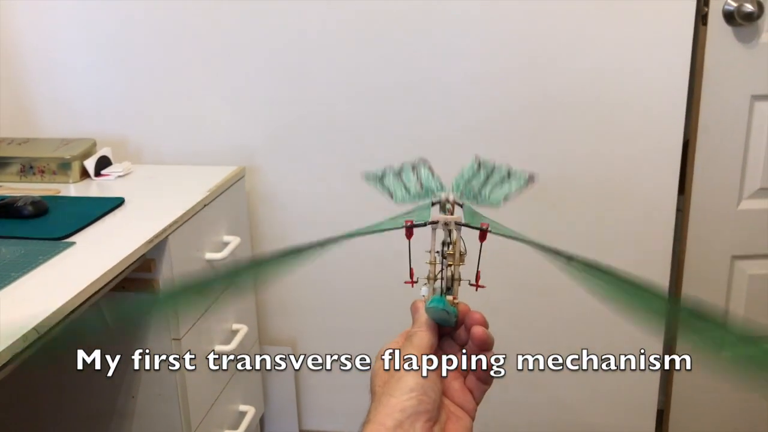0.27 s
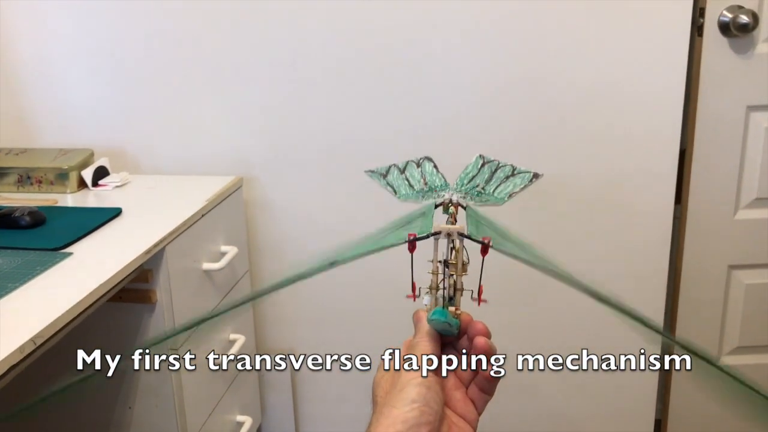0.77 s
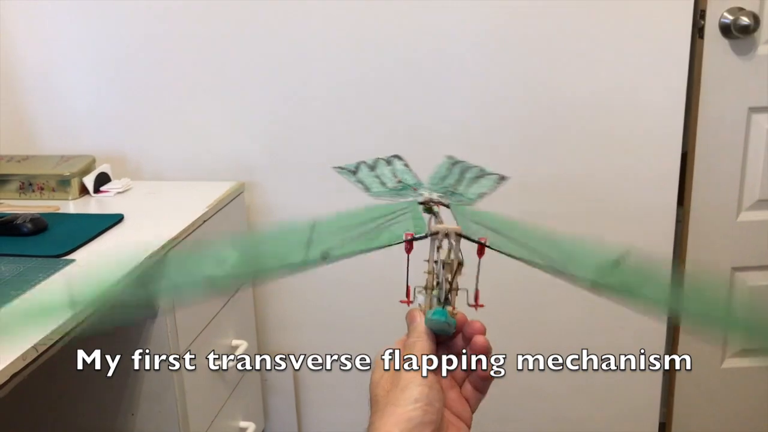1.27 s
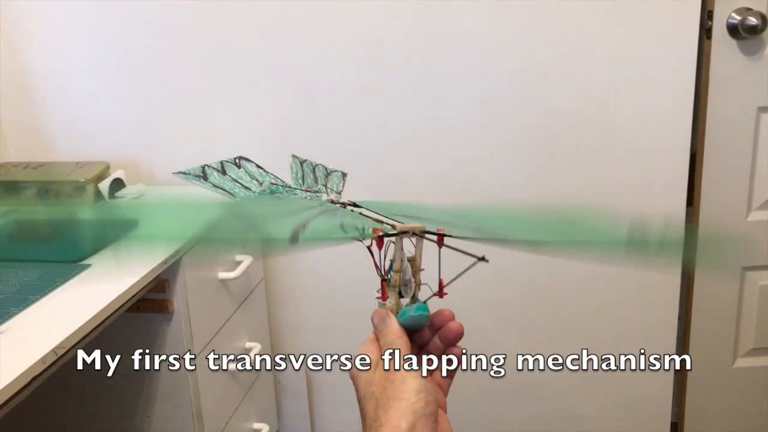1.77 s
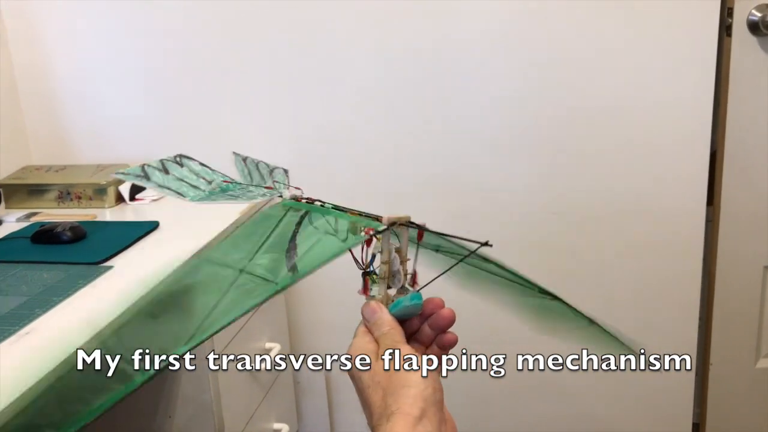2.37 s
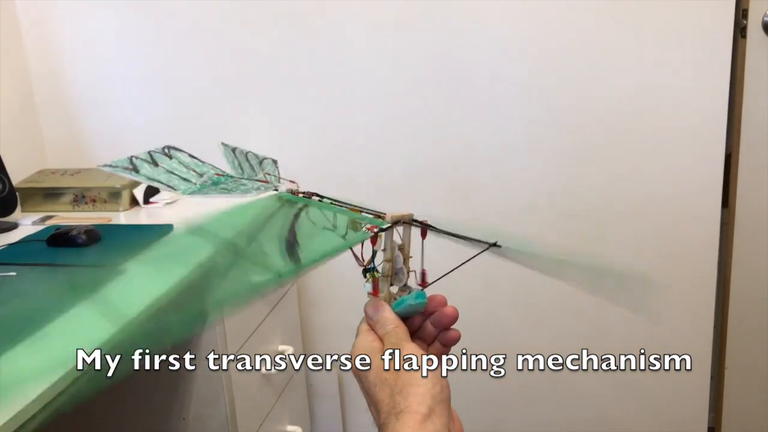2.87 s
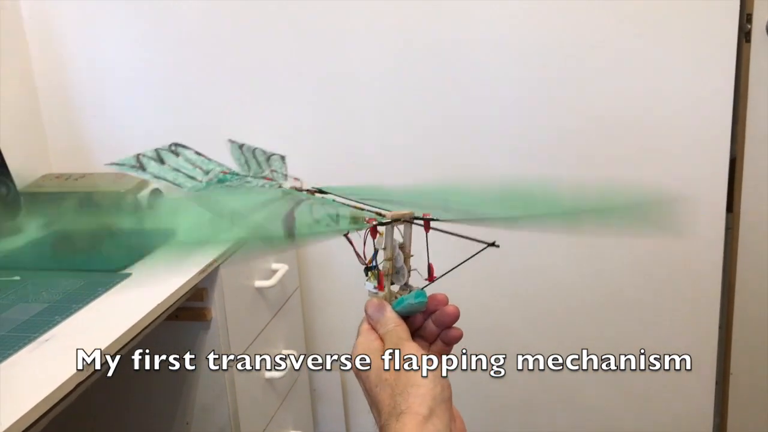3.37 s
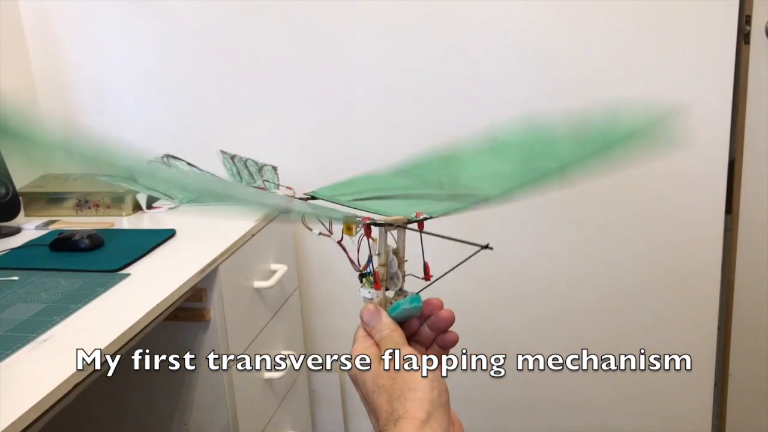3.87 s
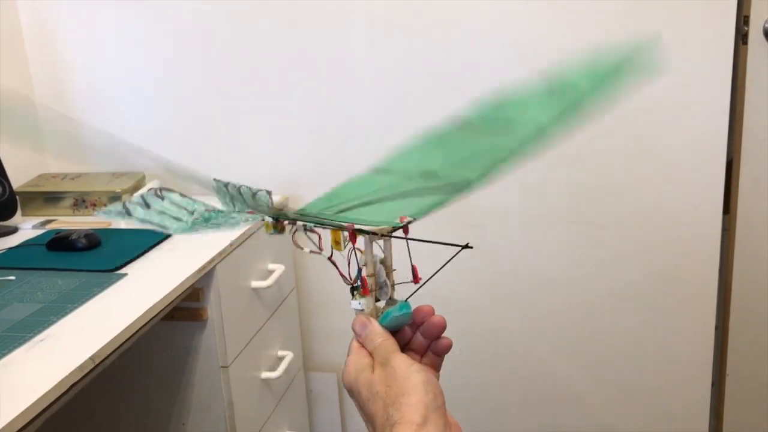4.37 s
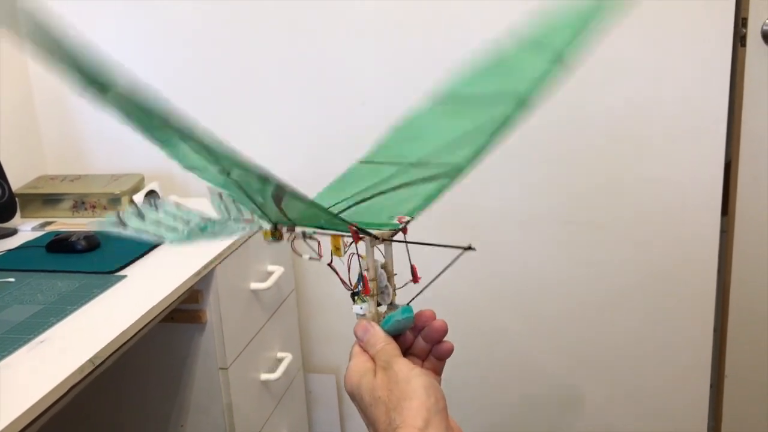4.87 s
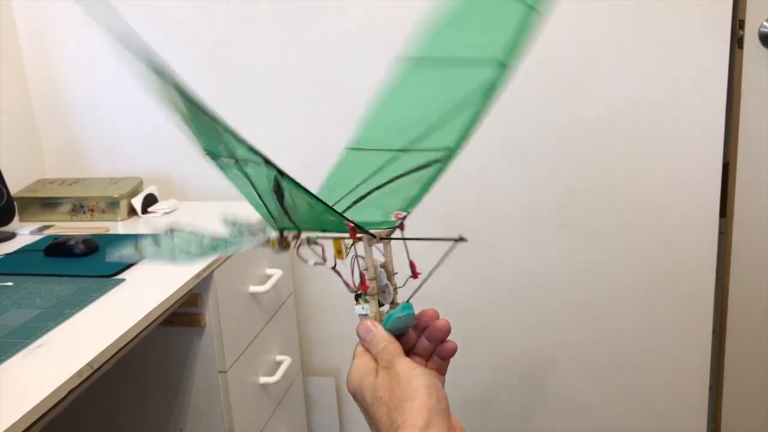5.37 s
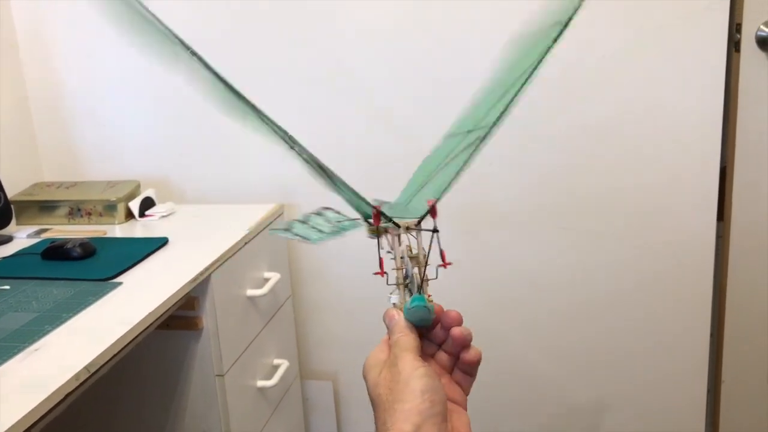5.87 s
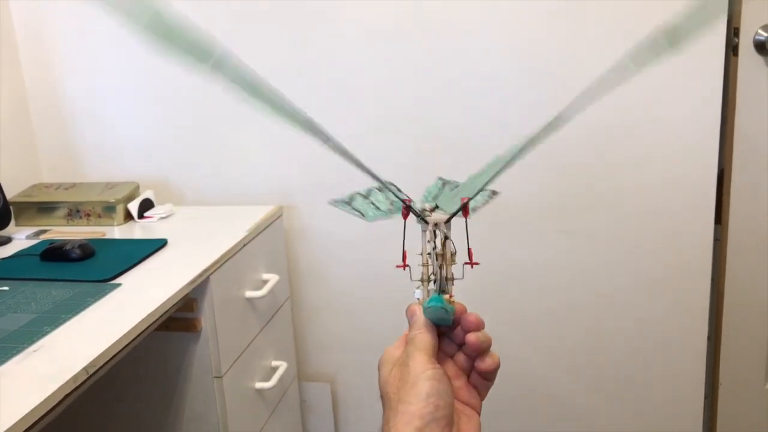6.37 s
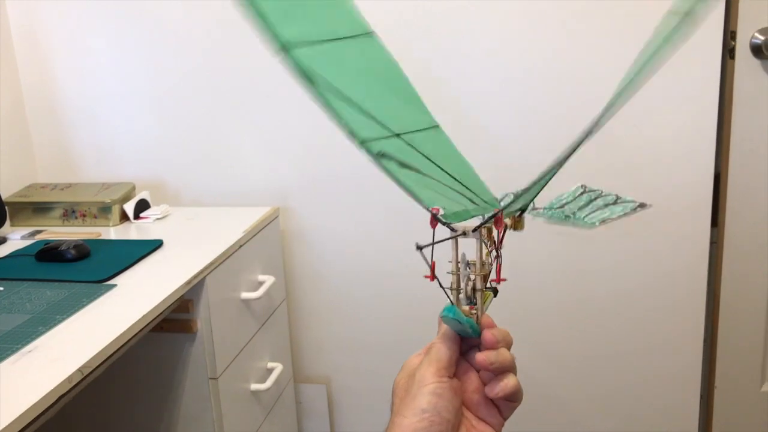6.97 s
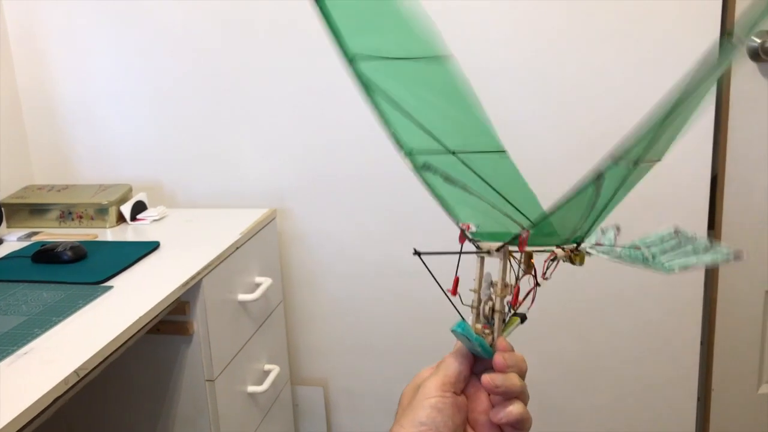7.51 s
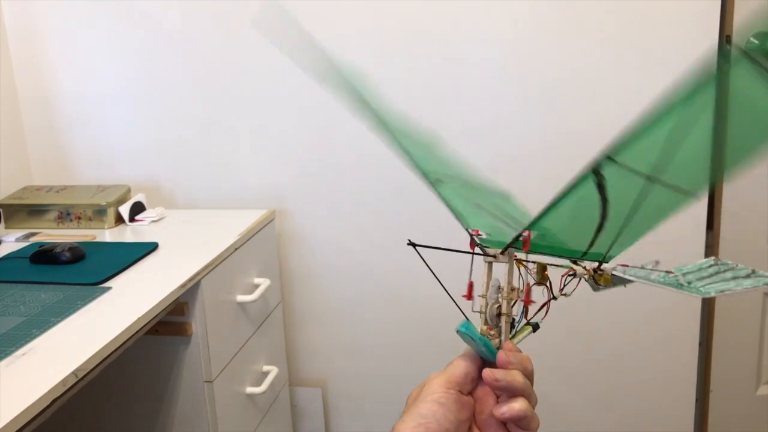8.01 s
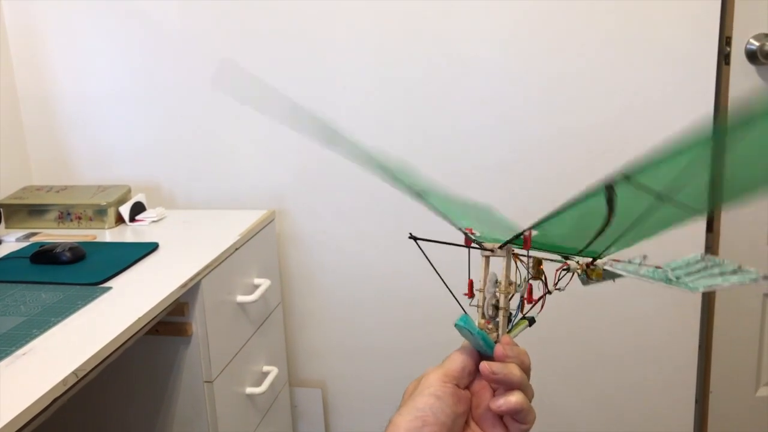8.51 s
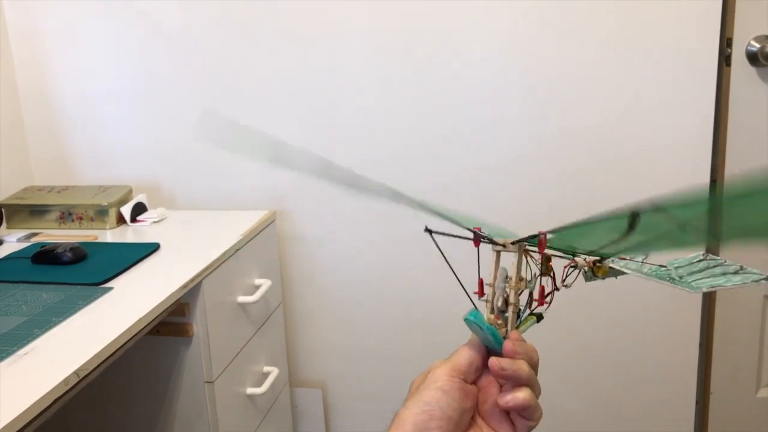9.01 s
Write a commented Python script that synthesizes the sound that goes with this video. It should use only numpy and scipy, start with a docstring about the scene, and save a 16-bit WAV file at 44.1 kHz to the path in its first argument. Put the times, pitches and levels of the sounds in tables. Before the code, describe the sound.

A tiny geared motor whines and rattles in swooping pulses, flapping a model bird's film wings nearly twice a second.

```python
"""A tiny geared motor whines inside a hand-held model bird, flapping its film wings nearly twice a second.
In every stroke it labours, races as the linkage goes slack and is braked almost to a stall, so the
whine swoops and the teeth rattle. The brushes hiss, the drive sizzles, the shaft hums, the wings rustle
and a loose joint ticks. The balance shifts as the bird is turned, in a small room with faint room tone."""
import sys
import numpy as np
from scipy import signal
from scipy.fft import rfft, irfft, next_fast_len
from scipy.io import wavfile
from scipy.ndimage import uniform_filter1d, map_coordinates

SR = 44100
rng = np.random.default_rng(int(sys.argv[2]) if len(sys.argv) > 2 else 0)


def file_out(sig):
    """Save sig as 16-bit WAV at sys.argv[1]."""
    # one column per channel
    cols = np.atleast_2d(sig).T
    # limit, then scale
    lim = np.clip(cols, -1, 1)
    pcm = np.round(lim * 32767).astype(np.int16)
    wavfile.write(sys.argv[1], SR, pcm)


N = 407925
TIME = np.arange(N) / SR

# The wingbeats. Each row: upstroke and downstroke starts in seconds, loaded speed factors up and down.
FLAP_CUES = [(-.177, .095, .99, .96), (.355, .639, .97, 1), (.894, 1.175, .98, .98),
             (1.437, 1.713, 1.03, 1.02), (1.97, 2.252, 1.01, 1.03), (2.506, 2.786, 1.01, 1.03),
             (3.037, 3.319, 1.01, .99), (3.571, 3.85, 1.01, 1), (4.113, 4.383, 1.02, 1.03),
             (4.64, 4.92, 1.01, 1.03), (5.176, 5.461, 1.01, 1), (5.717, 6.001, .98, 1.03),
             (6.254, 6.535, .98, .98), (6.793, 7.076, .98, .99), (7.341, 7.618, .98, .92),
             (7.887, 8.171, 1.01, 1), (8.431, 8.711, 1.03, 1), (8.97, 9.252, .99, 1)]
# The motor nearly stalls, recovers, sags under the air load, races and is braked.
# Each row: share of the stroke, tooth rate in Hz.
UP_SWOOP = [(0, 2300), (.14, 350), (.24, 1480), (.325, 1970), (.52, 1410), (.69, 1860), (.8, 2680),
            (.865, 3650), (.915, 4740), (.96, 3700)]
DOWN_SWOOP = [(0, 2170), (.14, 350), (.24, 1130), (.38, 2040), (.5, 1800), (.63, 2470), (.77, 4000),
              (.87, 5150), (.94, 4470)]
# The hand's moves. Each row: time in seconds, degrees right of head-on, lift from being nearer in dB.
HAND_MOVES = [(0, 0, 1.3), (1.25, 3, 0.55), (1.8, 41, .2), (3.6, 76, 0.33), (5.5, 50, 0.1), (6.3, -4, 0.4),
              (6.7, -17, 0), (7.1, -64, 1), (8.5, -48, 0.84), (9.25, -54, 1.2)]

# The tone colour of each part. Each row: frequency in Hz, relative level in dB.
FRAME_EQ = [(600, -32), (1020, -10), (1400, -21.5), (1900, -8.5), (2400, 5), (2850, -6.5), (3300, -2),
            (3720, -0.5), (4400, -8.5), (5750, -8), (7200, -16.5), (9650, -24.5), (10700, -30),
            (16000, -33)]  # how gearbox and frame radiate
RATTLE_EQ = [(400, -37), (770, -23.5), (1020, -9.5), (1430, -12), (1660, -3), (1800, -5.5), (2400, -1),
             (2900, -2.5), (3800, -1.5), (4800, -4), (5800, -3), (7600, -9.5), (9000, -10.5), (10600, -9.5),
             (16000, -39.5)]  # colliding teeth
BRUSH_EQ = [(3000, -18), (6000, -2.5), (7600, -4.5), (8300, 5), (10000, 4.5), (10600, -24), (12000, -2),
            (16000, -14.5)]
SIZZLE_EQ = [(7000, -27), (8300, -1), (10400, -4), (11500, 4.5), (12300, 8), (12750, -1), (13500, 6.5),
             (14000, -17), (14800, 2), (15200, -1), (16000, -17)]
FILM_EQ = [(30, -35), (70, -6.5), (135, 4.5), (200, -1.5), (330, 2), (750, -1), (1100, -6), (2500, 3.5),
           (8000, -60)]
SNAP_EQ = [(1000, -38), (2400, -8), (3800, -5.5), (6000, 0.5), (8500, -12), (12000, -8), (15000, -23)]
SCRAPE_EQ = [(1000, -42), (2400, 0), (3800, -20), (6500, 1.5), (8000, -6.5), (15000, -29)]
ROOM_TONE_EQ = [(20, -15), (35, -16), (55, -4.5), (100, -4), (200, -9.5), (400, -12), (1000, -22.5),
                (4000, -26.5)]
# Thin tones of the motor drive. Each row: pitch in Hz, relative level in dB.
DRIVE_TONES = [(11784, -2), (11965, -2), (12147, -1), (12237, -1), (12374, 0), (12987, -1), (13396, -2),
               (13532, 0), (13668, -5), (15278, -7)]
# Resonances. Each row: centre in Hz, width in Hz, gain in dB.
SPAR_MODES = [(1660, 16, -1.5), (1893, 20, -8), (2352, 17, -13), (2525, 22, -16)]  # the thin frame, rung by the gears
HUM_MODES = [(482, 10.6, 5), (631, 41, 0.5), (523, 780, -5.5)]  # shaken by the shaft
# The room's tail. Each row: frequency in Hz, seconds to fall 60 dB.
ROOM_DECAY = [(150, 0.16), (1000, 0.38), (4000, 0.28), (14000, 0.32)]

# How each part radiates. Each triple: gain in dB turned left, head-on and turned right.
WHINE_AIM_DB, OVERTONE_AIM_DB, SHRILL_AIM_DB = (-1, -0.76, 0.6), (3, 3, 1), (6, 0, -5)
RATTLE_AIM_DB, BRUSH_AIM_DB, SIZZLE_AIM_DB = (5.5, 5.5, 5), (1.5, -3.5, 1.7), (2, -4, 0)
WING_AIM_DB, SNAP_AIM_DB, SCRAPE_AIM_DB = (0, 0.5, 1), (-25, -23, -20.5), (-25.5, -21.5, -31)

TEETH_PER_TURN = 8
UP_WHINE_DB, UP_RATTLE_DB, DOWN_WHINE_DB, DOWN_RATTLE_DB = 0.5, 0.1, 1.66, 1  # each stroke's load
# Below this tooth rate the gears fall quiet.
STALL_HZ, STALL_WIDTH_HZ, STALL_WHINE_DB, STALL_RATTLE_DB = 1163, 230, -19, -11.5
# Speeding up past this tooth rate, the linkage is slack and the teeth barely press.
SLACK_HZ, SLACK_WIDTH_HZ, SLACK_HZ_PER_S, SLACK_DB = 2800, 180, 30000, -11
BRAKE_HZ_PER_S, BRAKE_WHINE_DB, BRAKE_RATTLE_DB = 157000, 2, 6  # hardest braking, and what it adds


def gear_whine(teeth, tooth_hz, pressure_db, jitter_rad=.2, fade_db=2.5, buzz_db=-16):
    """Meshing teeth sing in harmonics, less evenly at speed; unequal teeth add a buzz of shaft orders."""
    mesh = 2 * np.pi * teeth + jitter_rad * tooth_hz / 2000 * wobble(700)
    overtone_db, shrill_db = aim(OVERTONE_AIM_DB), aim(SHRILL_AIM_DB)
    harmonics_db = [0, overtone_db - 4, overtone_db - 2, shrill_db - 10, shrill_db - 17]
    tone = sum(amp(db + fade_db * wobble(55)) * np.sin(k * mesh) * (k * tooth_hz < SR / 2)
               for k, db in enumerate(harmonics_db, 1))
    buzz = sum(np.sin(k * mesh / TEETH_PER_TURN + 2 * np.pi * rng.random())
               for k in range(2, 2 * TEETH_PER_TURN) if k != TEETH_PER_TURN)
    flutter_db = overtone_db * wobble(130)  # shallower when turned right
    return coloured(amp(pressure_db - 39 + flutter_db) * (tone + amp(buzz_db) * buzz), FRAME_EQ)


def crank():
    """The crank sets the place in the flap (0-1 down, 1-2 up) and the tooth rate in Hz."""
    flaps = np.array(FLAP_CUES)
    starts, speed_factors = flaps[:, :2].ravel(), flaps[:, 2:4].ravel()
    strokes = np.interp(TIME, starts, np.arange(len(starts)))
    place = (strokes + 1) % 2
    cycle = DOWN_SWOOP + [(1 + share, hz) for share, hz in UP_SWOOP] + [(2, DOWN_SWOOP[0][1])]
    # The load differs from stroke to stroke; the free-running top speed does not.
    loaded = np.interp(strokes % 1, [0, .15, .65, .9], [0, 1, 1, 0])
    speed = 1 + loaded * (speed_factors[strokes.astype(int)] - 1)
    return place, swoop(cycle, place) * speed


def gear_load(place, tooth_hz):
    """Tooth pressure and rattle in dB: a stall ducks both, braking lifts both, slack ducks the whine."""
    speeding = uniform_filter1d(np.gradient(tooth_hz) * SR, size=200)  # Hz per second
    stalled = 1 - above(tooth_hz, STALL_HZ, STALL_WIDTH_HZ)
    slack = above(tooth_hz, SLACK_HZ, SLACK_WIDTH_HZ) * np.clip(speeding / SLACK_HZ_PER_S, 0, 1)
    braking = np.clip(-speeding / BRAKE_HZ_PER_S, 0, 1)
    down = uniform_filter1d((place < 1) * 1., size=400)
    pressure_db = UP_WHINE_DB * (1 - down) + DOWN_WHINE_DB * down
    pressure_db += STALL_WHINE_DB * stalled + SLACK_DB * slack + BRAKE_WHINE_DB * braking
    rattle_db = UP_RATTLE_DB * (1 - down) + DOWN_RATTLE_DB * down
    rattle_db += STALL_RATTLE_DB * stalled + BRAKE_RATTLE_DB * braking
    return pressure_db, rattle_db


def tooth_rattle(teeth, rattle_db, scatter_db=4, rub=0.64):
    """Teeth collide with uneven force and timing, over the rubbing of the gears."""
    passes = np.flatnonzero(np.diff(np.floor(2 * teeth)))  # each tooth is hit going in and coming out
    timing, polarity, strength = rng.standard_normal((len(passes), 3)).T
    when = np.clip(passes + 4 * timing, 0, N - 1).astype(int)
    force = np.sign(polarity) * amp(scatter_db * np.clip(strength, -2, 2)) * np.sqrt(np.gradient(passes))
    hits = unit(np.bincount(when, force, N))
    contacts = unit(hits + rub * rng.standard_normal(N))
    return amp(-44.5) * unit(coloured(contacts * amp(rattle_db + 1.26 * wobble(120)), RATTLE_EQ))


def brush_hiss(tooth_hz, rattle_db, shaken=1.37):
    """The brushes hiss louder as the motor speeds up and the gears shake it."""
    sparking_db = 2.8 * wobble(300)
    return amp(-50) * unit(noise(BRUSH_EQ) * tooth_hz ** 0.26 * amp(shaken * rattle_db + sparking_db))


def drive_sizzle(tooth_hz):
    """The drive current makes the windings sing, most when the motor is nearly stalled."""
    current = amp(5 * np.exp(-(tooth_hz / 1100) ** 2))
    tones = sum(amp(db) * np.sin(2 * np.pi * hz * TIME + .75 * wobble(25)) for hz, db in DRIVE_TONES)
    return amp(-54) * current * (noise(SIZZLE_EQ) + amp(-8) * unit(tones))


def shaft_hum(teeth, tooth_hz, rough_db=3):
    """Rotor unbalance shakes a hum out of the frame as the motor races."""
    shaft_angle = 2 * np.pi * teeth / TEETH_PER_TURN + 0.44 * wobble(160)
    shake = tooth_hz ** 1.77 * np.sin(shaft_angle) * amp(rough_db * wobble(160))
    return amp(-66) * unit(resonate(shake, HUM_MODES))


def wing_rustle(place, attack_strokes=0.062, decay_strokes=0.13):
    """The film is pulled taut as each stroke takes up the load, and flutters briefly."""
    since_reversal = (place + .5) % 1 - .5
    taut = np.exp(np.minimum(since_reversal / attack_strokes, -since_reversal / decay_strokes))
    flutter_db = 3 * wobble(110)
    return amp(aim(WING_AIM_DB) - 61.5) * unit(taut * noise(FILM_EQ) * amp(flutter_db))


def joint_ticks(snap_at=.387, scrape_at=.818, snap_t60=0.0065, scrape_t60=0.023, click_db=11):
    """The loose joint snaps across its play early in the downstroke and scrapes back late in it."""
    t = np.arange(SR // 20) / SR
    snaps, scrapes = np.zeros((2, N))
    for (_, top_s, *_), (bottom_s, *_) in zip(FLAP_CUES, FLAP_CUES[1:]):
        chatter = rng.standard_normal((2, len(t)))
        early, late = [round((top_s + share * (bottom_s - top_s)) * SR) for share in (snap_at, scrape_at)]
        snaps[early:][:len(t)] += amp(-60 * t / snap_t60) * chatter[0] + amp(click_db) * (t == 0)
        scrapes[late:][:len(t)] += amp(-60 * t / scrape_t60) * chatter[1]
    snaps = coloured(amp(aim(SNAP_AIM_DB)) * snaps, SNAP_EQ)
    return snaps + coloured(amp(aim(SCRAPE_AIM_DB)) * scrapes, SCRAPE_EQ)


def small_room(x, wet_db=-5, tail_count=3, predelay_s=.003):
    """Bare walls answer quickly; random crossfades between tails give the shifting echoes of movement."""
    hz, t, spectra = signal.stft(rng.standard_normal((tail_count, SR // 2)), SR, nperseg=256)
    decay = amp(-60 * t / along(ROOM_DECAY, hz)[:, None])
    tails = signal.istft(spectra * decay, SR, nperseg=256)[1]
    tails = np.pad(tails / np.linalg.norm(tails[0]), ((0, 0), (round(predelay_s * SR), 0)))
    sends = np.array([wobble(8) for _ in tails])
    echoes = signal.fftconvolve(x * sends / np.linalg.norm(sends, axis=0), tails, axes=1)
    return x + amp(wet_db) * echoes.sum(axis=0)[:N]


def room_tone():
    """A faint, steady bed of low air."""
    return amp(-68.5) * noise(ROOM_TONE_EQ)


def aim(ends_db):
    """One part's gain in dB at every sample, as the bird turns."""
    seconds, degrees, _ = np.transpose(HAND_MOVES)
    side = np.sin(np.radians(np.interp(TIME, seconds, degrees)))
    return np.interp(side * abs(side), [-1, 0, 1], ends_db)


def swoop(points, at):
    """A smooth repeating curve through (place, value) points, without overshoot."""
    x, y = np.transpose(points)
    step = np.diff(x)
    chord = np.diff(y) / step
    before = np.roll(chord, 1)
    slope = np.where(before * chord > 0, 2 * before * chord / (before + chord), 0)
    i = np.searchsorted(x, at, "right") - 1
    u = (at - x[i]) / step[i]
    bend = (1 - u) * (slope[i] - chord[i]) - u * (np.roll(slope, -1)[i] - chord[i])
    return y[i] + step[i] * u * (chord[i] + (1 - u) * bend)


def above(hz, edge_hz, width_hz):
    """A soft step from 0 to 1 as hz passes the edge."""
    return .5 + .5 * np.tanh((hz - edge_hz) / (2 * width_hz))


def amp(db):
    """Decibels to gain."""
    return 10 ** (np.asarray(db) / 20)


def unit(x):
    """Scaled to rms 1."""
    return x / np.sqrt(np.mean(x ** 2) + 1e-20)


def along(points, hz):
    """(Hz, value) points read on a log axis."""
    knots_hz, values = np.transpose(points)
    return np.interp(np.log(hz + 1), np.log(knots_hz + 1), values)


def wobble(rate):
    """A smooth random curve, rate knots a second."""
    return map_coordinates(rng.standard_normal(int(N * rate / SR) + 4), [TIME * rate])


def filtered(x, response):
    """x shaped by a frequency response."""
    size = next_fast_len(N + SR // 2)
    return irfft(rfft(x, size) * response(np.fft.rfftfreq(size, 1 / SR)), size)[:N]


def resonate(x, modes):
    """x through (Hz, width Hz, dB) resonances."""
    return filtered(x, lambda f: sum(amp(db) * 1j * f * width / (hz * hz - f * f + 1j * f * width)
                                     for hz, width, db in modes))


def coloured(x, eq, size=4096):
    """x through a minimum-phase EQ of (Hz, dB) points."""
    cepstrum = irfft(np.log(amp(along(eq, np.fft.rfftfreq(size, 1 / SR)))))
    causal_fold = 1 + np.sign(np.fft.fftfreq(size))
    impulse = irfft(np.exp(rfft(cepstrum * causal_fold)))
    return signal.fftconvolve(x, impulse)[:N]


def noise(eq):
    """Coloured noise of rms 1."""
    return unit(coloured(rng.standard_normal(N), eq))


def scene():
    """One crank drives the whole bird; bird and room sit in mono on both channels."""
    place, tooth_hz = crank()
    pressure_db, rattle_db = gear_load(place, tooth_hz)
    drift = .011 * wobble(70)
    teeth = np.cumsum(tooth_hz * (1 + drift)) / SR  # teeth passed so far
    gears = gear_whine(teeth, tooth_hz, pressure_db + aim(WHINE_AIM_DB))
    gears += tooth_rattle(teeth, rattle_db + aim(RATTLE_AIM_DB))
    motor = amp(aim(BRUSH_AIM_DB)) * brush_hiss(tooth_hz, rattle_db)
    motor += amp(aim(SIZZLE_AIM_DB)) * drive_sizzle(tooth_hz)
    motor += shaft_hum(teeth, tooth_hz)
    bird = gears + resonate(gears, SPAR_MODES) + motor + wing_rustle(place) + joint_ticks()
    seconds, _, near_db = np.transpose(HAND_MOVES)
    mono = small_room(amp(np.interp(TIME, seconds, near_db)) * bird) + room_tone()
    return np.array([mono, mono])


def record(dry, top_hz=15750):
    """A brick-wall low-pass trims the very top."""
    return np.array([filtered(channel, lambda hz: hz < top_hz) for channel in dry])


dry = scene()
out = record(dry)
file_out(out)
```